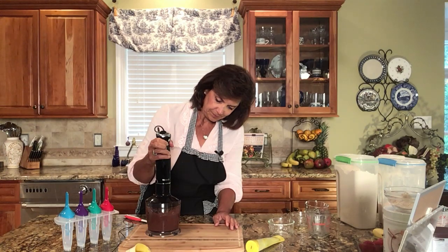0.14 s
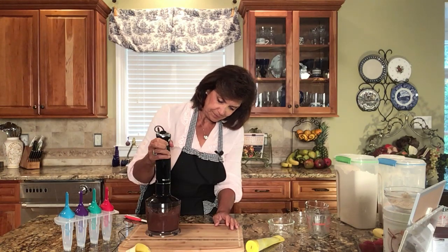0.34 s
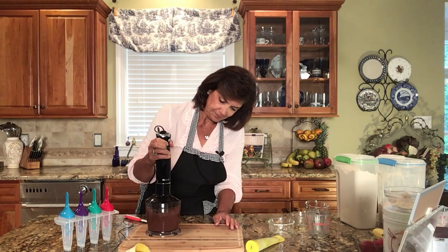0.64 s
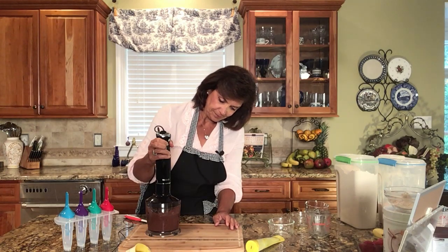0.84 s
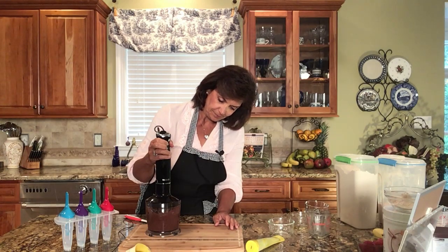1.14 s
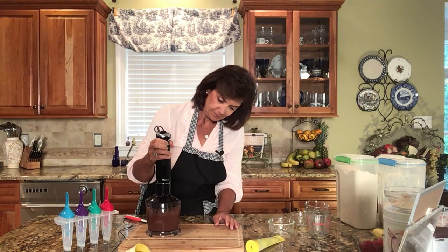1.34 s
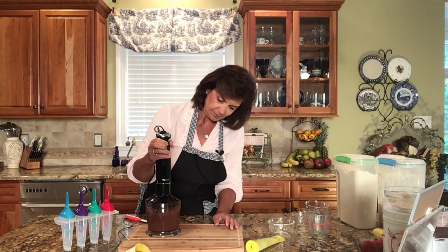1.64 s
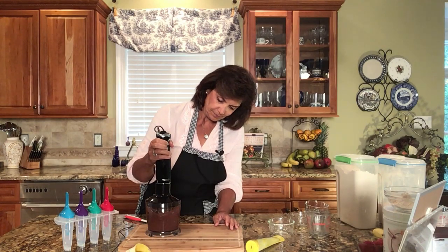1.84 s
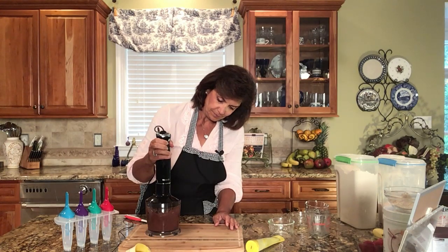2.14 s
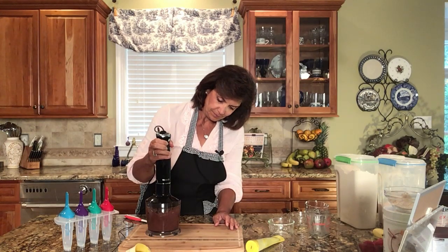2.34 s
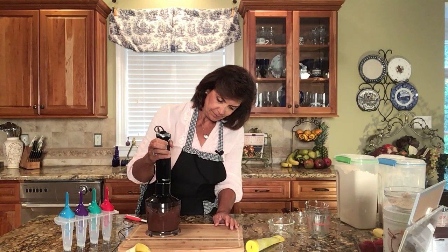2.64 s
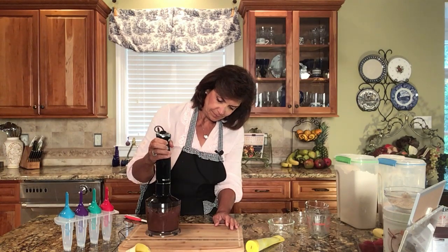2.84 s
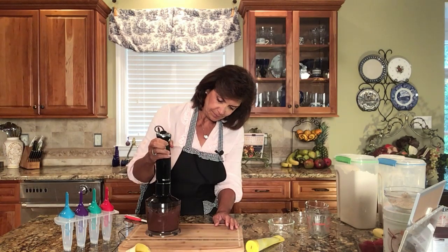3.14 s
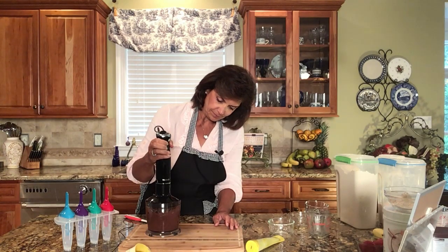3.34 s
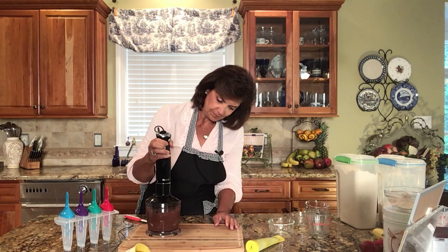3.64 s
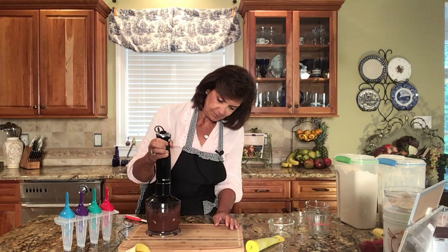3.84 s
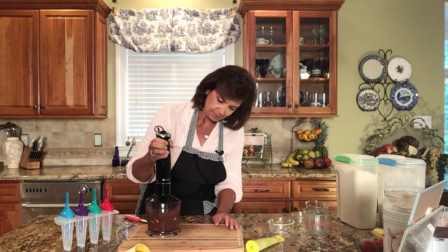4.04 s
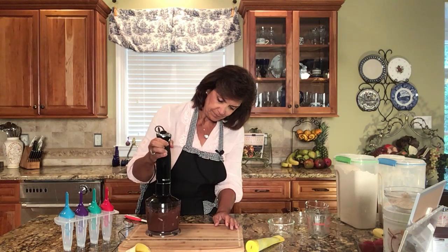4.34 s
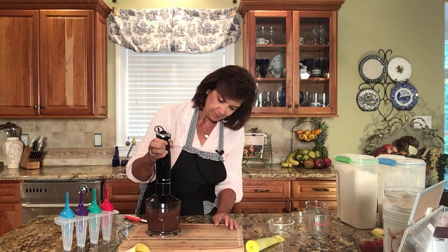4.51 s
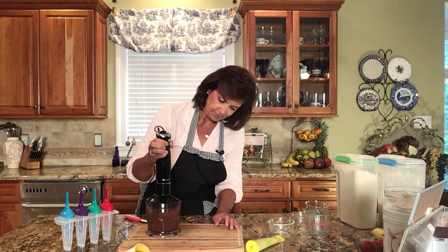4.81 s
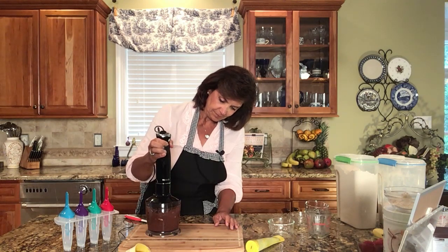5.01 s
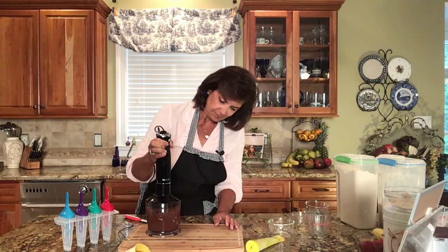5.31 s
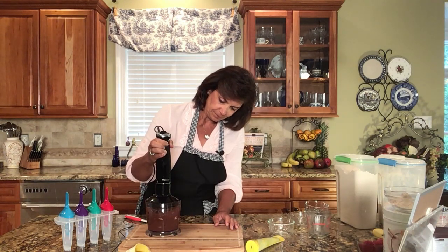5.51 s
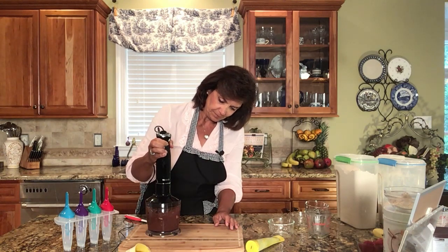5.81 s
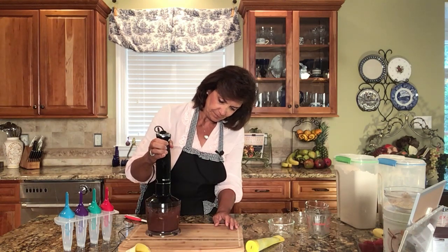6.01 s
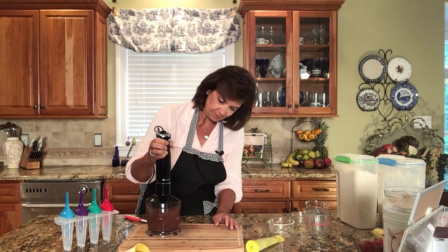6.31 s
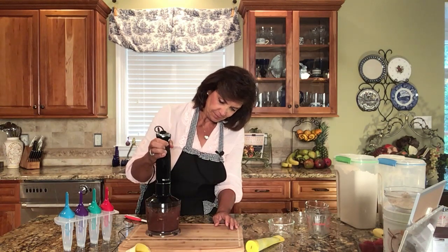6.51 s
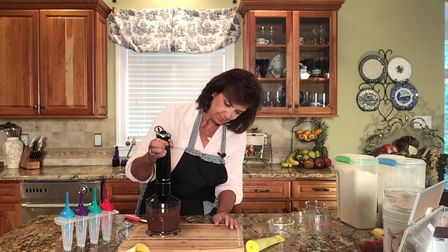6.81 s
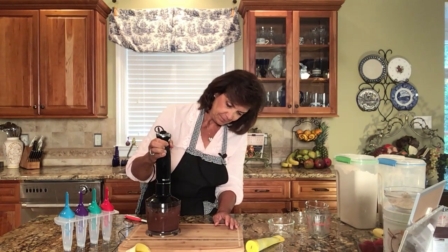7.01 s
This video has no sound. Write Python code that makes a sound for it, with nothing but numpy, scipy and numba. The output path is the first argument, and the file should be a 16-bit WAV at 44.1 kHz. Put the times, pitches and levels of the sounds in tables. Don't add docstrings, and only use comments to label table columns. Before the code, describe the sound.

Harsh electric chopper runs steadily, winds down, then is pulsed on and off with gritty churning and lumpy knocks, finally staying on.

```python
import sys
import numpy as np
from scipy import signal
from scipy.fft import rfft, irfft
from scipy.io import wavfile
from scipy.ndimage import uniform_filter1d
from numba import njit

SR = 44100
rng = np.random.default_rng(int(sys.argv[2]) if len(sys.argv) > 2 else 0)


def dump_mix(stems):
    frames = np.atleast_2d(stems).T
    limited = np.clip(frames, -1, 1)
    pcm = np.round(limited * 32767).astype(np.int16)
    wavfile.write(sys.argv[1], SR, pcm)


def gain_from_db(level_db):
    decades = np.asarray(level_db, float) / 20
    return 10 ** decades


N = 315756

# [on t/s, off t/s]
PRESSES = [
    (-.5, 1.175),
    (1.463, 1.89),
    (2.440, 2.775),
    (3.073, 3.39),
    (3.684, 3.96),
    (4.273, 4.535),
    (4.893, 5.13),
    (5.337, 5.625),
    (5.736, 6.0),
    (6.569, 8.),
]
# [early shaft f/Hz, settled shaft f/Hz, slot level/dB, commutator level/dB, coasting level/dB]
LOADS = [(132.85, 133.5, -25.5, -31, -1), (145.6, 131.5, -25, -31.5, -2.5),
         (139.7, 131.5, -26, -29.5, -3.5), (140.55, 131, -27, -31, 1), (142.1, 131, -26, -30.5, 1),
         (142, 131, -26.5, -27.5, -1), (142.1, 132, -23.5, -27, -4), (138.5, 131, -25, -25.5, -4.5),
         (136.6, 131, -26, -25.5, -3), (138.4, 130.5, -25.5, -23.5, -4)]
# [churn level/dB, gear and air level/dB, coasting fade rate/1 (1 = usual)]
EFFORT = [(-0.01, -0.85, 0.87), (-0.49, -0.71, 0.96), (-0.15, -0.47, 1.42), (.2, 0.003, .95),
          (-0.49, 0.16, 0.93), (-0.39, -0.12, 1.1), (-0.57, 0.83, 0.87), (-0.026, 0.34, .9),
          (0.74, 0.27, 1.08), (0.26, 0.92, 1.01)]
# [multiple of shaft speed/1, level/dB, unsteadiness/1]
MOTOR_TONES = [(1, -12, .4), (10, -10, .2), (11, -5, .12), (12, -4, .12), (13, -3, .12), (14, -9, .2),
               (22, -10, .3), (23, -5, .25), (24, 1, .22), (25, -14, .5), (28, -15, .3), (47, -15, .3),
               (48, -11, .25), (60, -19, .7)]
# [multiple of shaft speed/1, width f/Hz, level/dB]
HOARSE_BANDS = [(12, 350, -4), (23.6, 350, -8), (37, 300, -16), (48, 300, -10), (59.5, 500, -8),
                (83.5, 600, -30), (95, 800, -33.5)]
# [f/Hz, level/dB]
SHELL_LIFT = [(60, -12), (500, 0.5), (950, 8), (1300, -1), (1700, 0.5), (2200, 12), (2600, 6), (3150, 4),
              (3750, 1.5), (4700, 2), (5700, 8.5), (6300, -2), (7100, -1), (16000, 26)]
# [multiple of blade speed/1, level/dB]
BLADE_TONES = [(2, -39), (4, -38), (6, -36), (8, -36), (10, -31), (12, -35), (16, -38)]
# [running level/dB, switch-on surge level/dB, surge t/s, release level/dB, coasting power of speed/1]
RUSH_LEVELS = [(-18.5, 2.5, 0.032, -1, 0.95), (-14.5, -0.2, .05, -0.2, 1.69), (-21, 3, 0.074, 0.1, 1.69)]
# [f/Hz, level/dB per Hz]
CHURN_SPECTRUM = [(15, -51), (25, -22.5), (43, -25), (75, -9), (124, -1.5), (179, -13.5), (198, -7),
                  (260, -1), (287, -2), (438, 0), (859, -3), (1140, -12.5), (1400, -6), (1820, -63),
                  (3080, -120)]
# [f/Hz, level/dB per Hz]
GEAR_SPECTRUM = [(530, -56), (900, -11.5), (957, -3.5), (1450, -9.5), (2130, 1), (2700, -2.5), (3010, 2),
                 (3450, -10.5), (3830, -13), (4070, -11.5), (4600, -12.5), (5980, -47), (10100, -120)]
# [f/Hz, width f/Hz, level/dB]
HOUSING_MODES = [(2200, 160, -34), (2560, 160, -11), (3183, 310, -9), (3690, 60, -18)]
# [f/Hz, level/dB per Hz]
AIR_SPECTRUM = [(2120, -34), (3600, -4.5), (3800, -1.5), (4040, -15), (4770, -3.5), (5560, -3),
                (6210, -3.5), (6560, -3.5), (7940, -4), (8750, -9.5), (10100, -15), (11000, -18.5),
                (11700, -18), (12800, -19.5), (15600, -28)]
# [f/Hz, width f/Hz, level/dB]
VENT_MODES = [(5170, 150, -33), (5800, 480, -20), (6920, 580, -7), (7250, 380, -6.5)]
# [f/Hz, level/dB per Hz]
KITCHEN_SPECTRUM = [(12, -34), (20, -2), (78, -5.5), (119, -19), (208, -15), (333, -22), (988, -23.5),
                    (1540, -26.5), (3660, -34), (11500, -47), (15600, -35)]
# [f/Hz, t60 t/s]
ECHO_DECAY = [(150, 0.32), (700, 0.56), (2500, 0.5), (7000, 0.49)]
# [t/s, peak level/dB, f/Hz]
LUMP_HITS = [(0.72, -5, 463), (0.813, -3, 530), (0.851, -3, 405), (0.972, -4, 630), (1.105, -4, 468),
             (1.366, -9.5, 930), (1.662, 0.5, 870), (2.114, -14.5, 315), (2.472, -0.5, 2250),
             (2.941, -4.5, 653), (3.112, 0.5, 2070), (3.294, -3.5, 490), (3.384, -2.5, 427),
             (3.467, -15, 1010), (3.863, -2, 2170), (4.574, 0, 563), (5.056, -3, 580), (5.742, -1.5, 560),
             (6.012, -9, 2200), (6.696, -8, 2150), (6.794, -1.5, 665)]

RATED_HZ, MAINS_HUM_HZ = 132, 120
SPIN_UP_S, SETTLE_S, BITE_S = .047, .11, .0082
DRAG_PER_S, FRICTION_HZ_PER_S = 2.6, 260.
COAST_FLUTTER_DB, GLIDE_DB, STRAIN_DB, RATTLE_DB = 4.5, -.5, 5, 3.5
KITCHEN_DB, ECHO_DB = -48.5, -10.5


def level(x, db):
    return x * gain_from_db(db) / np.sqrt(np.mean(x ** 2))


def colour(x, spectrum, modes=()):
    f = np.maximum(np.fft.rfftfreq(N, 1 / SR), 1)
    hz, db = np.transpose(spectrum)
    power = gain_from_db(np.interp(np.log(f), np.log(hz), db, left=-80, right=-80)) ** 2
    power = power / power.sum()
    for centre_hz, width_hz, peak_db in modes:
        peak = 1 / (1 + (2 * (f - centre_hz) / width_hz) ** 2) ** 2
        power = power + gain_from_db(peak_db) ** 2 * peak / peak.sum()
    return level(irfft(rfft(x) * np.sqrt(power), N), 0)


def walk(rate_hz):
    span = max(int(SR / rate_hz), 1)
    smooth = uniform_filter1d(rng.standard_normal(N), span)
    return level(uniform_filter1d(smooth, span), 0)


def button(t):
    target_hz, tone_db = np.zeros(N), np.zeros((3, N))
    for (on_s, off_s), (early_hz, settled_hz, *db) in zip(PRESSES, LOADS):
        held = (t >= on_s) & (t < off_s)
        sag = np.exp(-(t[held] - on_s) / SETTLE_S)
        target_hz[held] = settled_hz + (early_hz - settled_hz) * sag
        tone_db[:, t >= on_s] = np.c_[db]
    return target_hz, tone_db


@njit
def spin(target_hz, rise_s, drag, friction):
    speed_hz, v = np.empty(len(target_hz)), target_hz[0]
    for i in range(len(target_hz)):
        if target_hz[i] > 0:
            v = np.sqrt(v * v + (target_hz[i] ** 2 - v * v) / (rise_s * SR))
        else:
            v = max(v - (drag * v + friction) / SR, 0.)
        speed_hz[i] = v
    return speed_hz


def whine(turns, speed_hz, power, tone_db):
    lift_hz, lift_db = np.transpose(SHELL_LIFT)
    parts = [(k, db, 1 + rough * (walk(64) + 1j * walk(60))) for k, db, rough in MOTOR_TONES]
    parts += [(k, db, walk(width_hz) + 1j * walk(width_hz)) for k, width_hz, db in HOARSE_BANDS]
    slow = np.clip(5 - speed_hz / 26, 0, 1)
    out = 0
    for k, db, waver in parts:
        strain_db = STRAIN_DB * power * slow * (k > 30)
        group_db = tone_db[int(k > 18)]
        gain = gain_from_db(db + strain_db + group_db + np.interp(k * speed_hz, lift_hz, lift_db))
        out = out + gain * np.imag(waver * np.exp(2j * np.pi * (k * turns + rng.random())))
    coast_db = uniform_filter1d(1 - power, 600) * tone_db[2]
    flutter_db = slow * (GLIDE_DB + COAST_FLUTTER_DB * np.tanh(1.5 * walk(110)))
    return out * gain_from_db(coast_db + flutter_db) * (speed_hz / RATED_HZ) ** .9


def blade(turns, share):
    out = 0
    for k, db in BLADE_TONES:
        out = out + gain_from_db(db + 3.07 * walk(18)) * np.sin(2 * np.pi * (k * turns / 3 + rng.random()))
    return out * share ** 2


def rush_gains(t, share, power):
    press = np.searchsorted([on_s for on_s, _ in PRESSES], t, side="right") - 1
    since_s = t - np.array(PRESSES)[press, 0]
    churn_db, gear_db, fade = np.array(EFFORT)[press].T
    run_db, surge_db, surge_s, release_db, law = np.array(RUSH_LEVELS).T[:, :, None]
    db = run_db + [churn_db, gear_db, gear_db]
    db = db + surge_db * np.exp(-since_s / surge_s) + release_db * (1 - power)
    gain = gain_from_db(db) * np.clip(share, 1e-3, 1) ** (law * fade * (1 - power))
    span = int(BITE_S * SR)
    return uniform_filter1d(gain, span, axis=1, origin=(span - 1) // 2)


def rush(turns, power, spectrum, modes, shaft, sweep, mains, grit_db, flicker_db):
    t = np.arange(N) / SR
    throb = 1 + shaft * np.cos(2 * np.pi * turns) + sweep * np.cos(2 * np.pi * turns / 3)
    throb = throb * (1 + mains * power * np.cos(2 * np.pi * MAINS_HUM_HZ * t))
    grit = gain_from_db(grit_db * walk(240) + flicker_db * walk(22))
    return colour(rng.standard_normal(N) * throb * grit, spectrum, modes)


def mains_hum(t, power):
    return gain_from_db(-40 + 6.4 * walk(43)) * uniform_filter1d(power, 300) * np.sin(2 * np.pi * MAINS_HUM_HZ * t)


def kitchen():
    return level(colour(rng.standard_normal(N), KITCHEN_SPECTRUM), KITCHEN_DB)


def room(x, wet_db):
    t = np.arange(int(.7 * SR)) / SR
    tail = 0
    for hz, t60_s in ECHO_DECAY:
        band = signal.butter(1, [hz / 2.2, hz * 2.2], "band", fs=SR, output="sos")
        tail = tail + signal.sosfilt(band, rng.standard_normal(len(t))) * gain_from_db(-60 * t / t60_s)
    tail = tail * np.minimum(t / .011, 1)
    tail = tail / np.sqrt(np.sum(tail ** 2))
    return x + gain_from_db(wet_db) * signal.fftconvolve(x, tail)[:N]


def ring(hz, t60_s):
    t = np.arange(int(.06 * SR)) / SR
    return np.sin(2 * np.pi * hz * t) * gain_from_db(-60 * t / t60_s)


def lumps():
    out = np.zeros(N + SR)
    for hit_s, db, hz in LUMP_HITS:
        knock = ring(hz, .035) + .4 * ring(1.7 * hz, .015)
        start = int(hit_s * SR)
        out[start:start + len(knock)] += gain_from_db(db - 4.5) * knock
    return out[:N]


def switch():
    clicks = np.zeros(N)
    clicks[[int((on_s - .013) * SR) for on_s, _ in PRESSES[1:]]] = gain_from_db(-36)
    t = np.arange(int(.06 * SR)) / SR
    scrape = uniform_filter1d(rng.standard_normal(len(t)), size=5) * gain_from_db(-60 * t / .02)
    return signal.fftconvolve(clicks, ring(500, .02) + scrape)[:N]


def scene():
    t = np.arange(N) / SR
    target_hz, tone_db = button(t)
    speed_hz = spin(target_hz * (1 + .003 * walk(10)), SPIN_UP_S, DRAG_PER_S, FRICTION_HZ_PER_S)
    turns, share = np.cumsum(speed_hz) / SR, speed_hz / RATED_HZ
    power = 1. * (target_hz > 0)
    churn_gain, gear_gain, air_gain = rush_gains(t, share, power)
    alive = np.clip(uniform_filter1d(share, 4000, origin=1999) / .11 + power, 0, 1)
    bright = 1 - power * np.clip(.9 - share * .91, 0, 1)
    rattle_db = RATTLE_DB * (1 - power) * np.tanh(walk(60))
    churn = churn_gain * gain_from_db(-1.5) * rush(turns, power, CHURN_SPECTRUM, (), .2, .2, .15, 1.6, .7)
    gear = rush(turns, power, GEAR_SPECTRUM, HOUSING_MODES, .3, .064, .045, 1.4, .68)
    gear = gear_gain * gain_from_db(-3.5 + rattle_db) * gear
    air = air_gain * gain_from_db(-2) * rush(turns, power, AIR_SPECTRUM, VENT_MODES, .15, .15, .22, 1.6, .35)
    blender = alive * (churn + bright * (gear + air))
    blender = blender + whine(turns, speed_hz, power, tone_db) + blade(turns, share) + mains_hum(t, power)
    return (room(blender + lumps() + switch(), ECHO_DB) + kitchen())[None]


def band_limit(x):
    return signal.sosfilt(signal.butter(12, 15720, fs=SR, output="sos"), x)


def record(dry):
    soft = np.tanh(.7 * dry) / .7
    mix = signal.sosfilt(signal.butter(2, 13500, fs=SR, output="sos"), soft)
    return band_limit(mix)


dry = scene()
out = record(dry)
dump_mix(out)
```